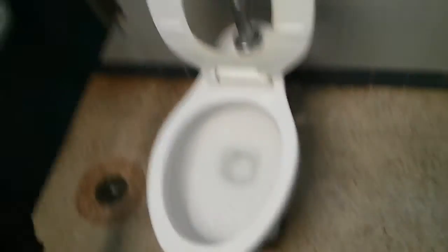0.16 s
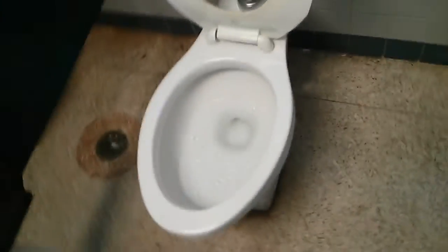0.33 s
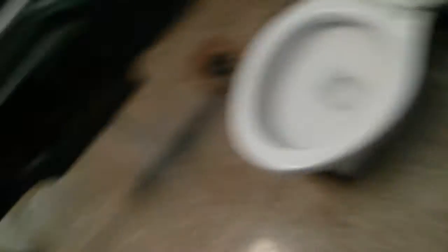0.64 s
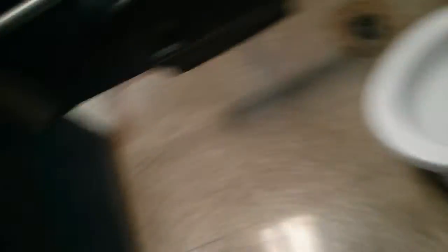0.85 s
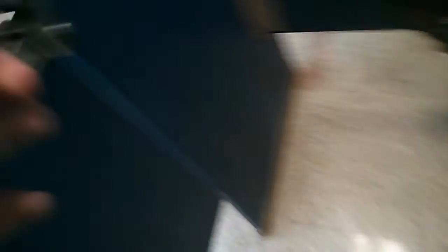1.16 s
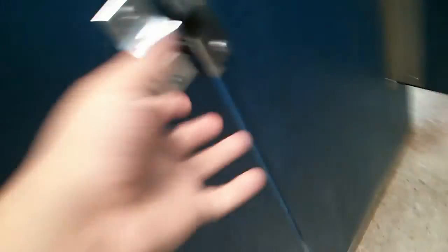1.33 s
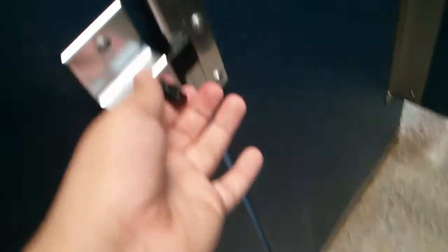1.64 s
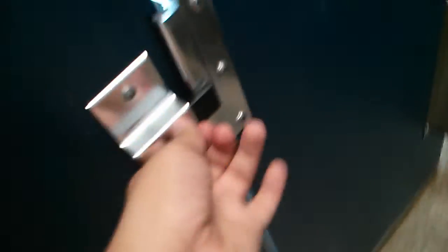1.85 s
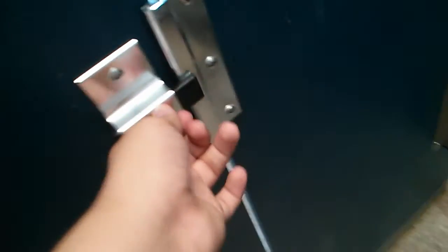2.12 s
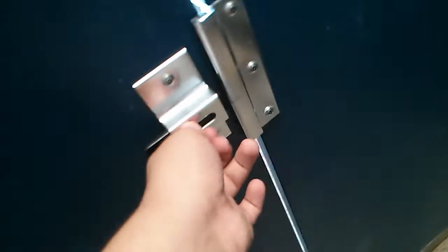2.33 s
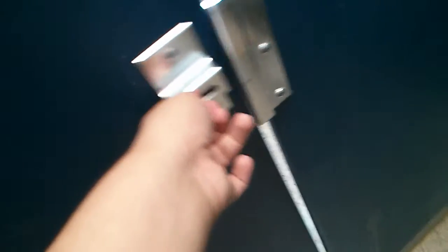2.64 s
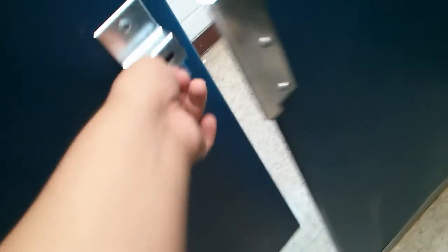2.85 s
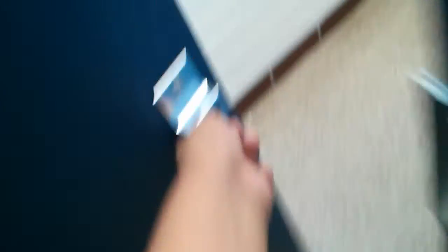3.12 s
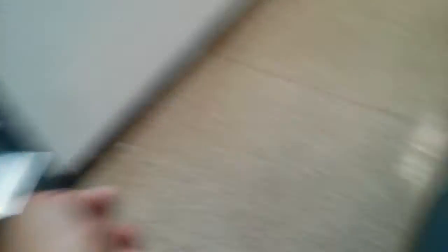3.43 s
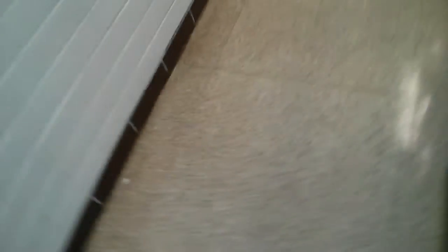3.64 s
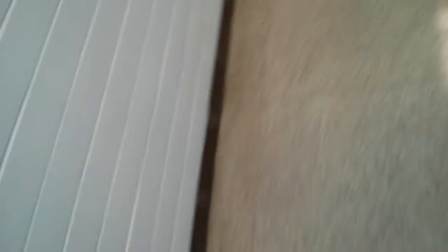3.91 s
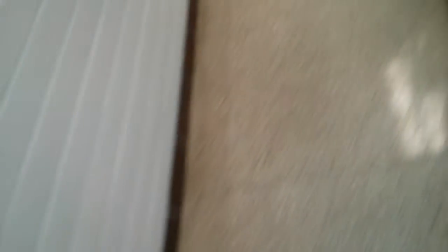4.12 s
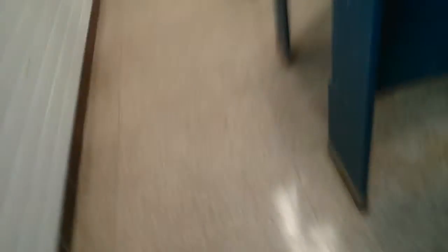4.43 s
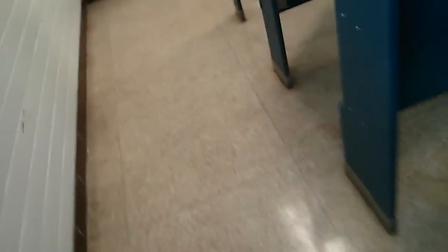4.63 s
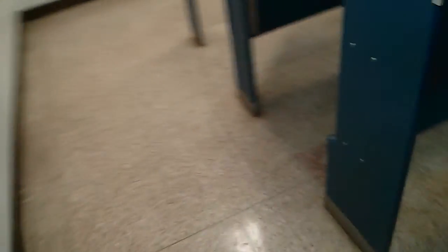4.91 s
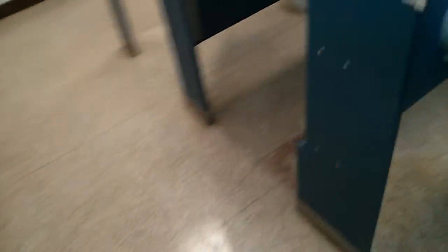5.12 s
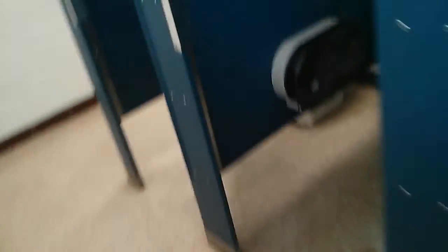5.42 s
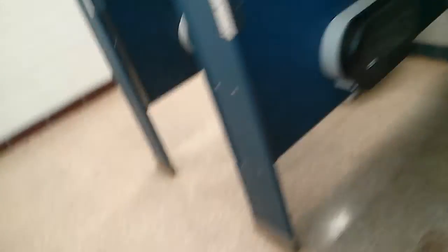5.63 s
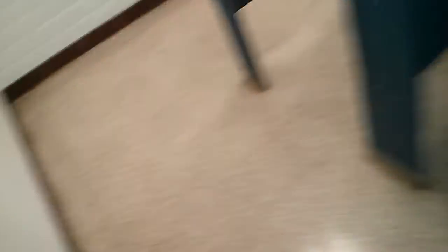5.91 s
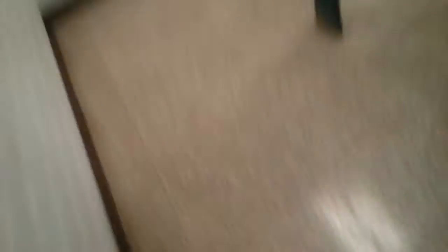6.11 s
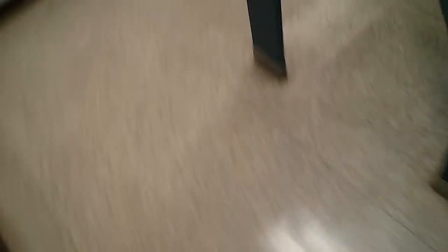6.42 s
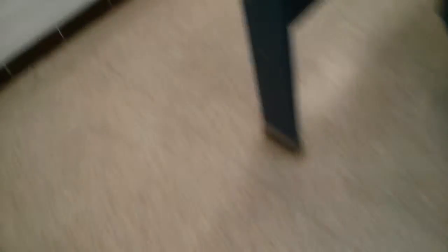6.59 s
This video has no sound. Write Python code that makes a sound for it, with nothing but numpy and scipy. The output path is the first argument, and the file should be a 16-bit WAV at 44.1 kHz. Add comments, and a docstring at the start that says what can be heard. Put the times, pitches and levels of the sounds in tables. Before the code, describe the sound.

A steady low electrical hum swells and fades as the microphone moves through a hard-walled restroom. Small plastic taps and soft brushing lead to a hard metal crack of a stall bolt, then a few loose latch rattles. After a quieter pause the door clacks gently; low, soft steps follow, with close clicks on the device, faint squeaks and rustling, until the end.

```python
"""A tiled restroom: someone walks out of a toilet stall while a mains-driven motor, probably the ventilation, hums.
The hum is a set of sines; each swells and fades as the microphone moves through the room's standing waves.
The steel latch snaps and rattles and the door clacks: short noise bursts plus ringing tones, with echoing walls.
Soft steps, brushing and squeaks are shaped noise; taps on the hand-held device are very short clicks.
Underneath lie rumbling air, a faint rustle of clothes and hiss, all made of coloured noise."""
import sys
import numpy as np
from scipy import signal
from scipy.fft import rfft, irfft, next_fast_len
from scipy.io import wavfile
from scipy.ndimage import map_coordinates

SR = 44100
rng = np.random.default_rng(int(sys.argv[2]) if len(sys.argv) > 2 else 0)


def dump_mix(stems):
    """Bounce the given channels to the path in sys.argv[1] as a 16-bit WAV at rate SR."""
    frames = np.atleast_2d(stems).T  # one column per channel
    limited = np.clip(frames, -1, 1)  # hard clip at full scale
    pcm = np.round(limited * 32767).astype(np.int16)
    wavfile.write(sys.argv[1], SR, pcm)


N = 298107  # length of the scene in samples

# how briskly the walker moves, faster once outside the stall: (time [s], share of full pace)
WALK_PACE = [(3.3, 0.38), (4.2, 0.98)]


def amp(db):
    """Turn decibels into a gain factor."""
    return 10 ** (np.asarray(db) / 20)


def unit(x):
    """Scale to an rms (average strength) of 1."""
    return x / np.sqrt(np.mean(x ** 2) + 1e-20)


def along(points, hz):
    """Read a curve of (frequency [Hz], value) points, joined by straight lines on a log frequency axis."""
    f, v = np.transpose(points)
    return np.interp(np.log(hz + 1), np.log(f + 1), v)


def curves(rows):
    """Join the points of each column after the time into a curve with one value per sample."""
    times, *columns = np.transpose(rows)
    return [np.interp(np.arange(N) / SR, times, column) for column in columns]


def wobble(rate):
    """A smooth random curve through `rate` random points a second."""
    knots = rng.standard_normal(int(N * rate / SR) + 4)
    return map_coordinates(knots, [np.arange(N) * rate / SR])


def noise(spectrum, size=N):
    """Noise with the given balance of low and high frequencies, rms 1."""
    m = next_fast_len(size)
    gain = amp(along(spectrum, np.fft.rfftfreq(m, 1 / SR)))
    return unit(irfft(rfft(rng.standard_normal(m)) * gain, m)[:size])


def band(hz, octaves):
    """A hump-shaped spectrum around hz."""
    hump = [(-4, -60), (-2, -24), (-1, -6), (0, 0), (1, -6), (2, -24), (4, -70)]  # (widths away, dB)
    return [(hz * 2 ** (k * octaves), db) for k, db in hump]


def fade(t60):
    """One second of exponential decay that falls by 60 dB every t60 seconds."""
    return np.exp(-np.log(1000) * np.arange(SR) / SR / t60)


def click(spectrum, size=1024):
    """A single impulse with this spectrum, its energy as early as possible (minimum phase), peak 1."""
    cepstrum = irfft(np.log(amp(along(spectrum, np.fft.rfftfreq(size, 1 / SR)))))
    # folding the second half onto the first leaves nothing before time zero
    cepstrum[1:size // 2] *= 2
    cepstrum[size // 2 + 1:] = 0
    pulse = irfft(np.exp(rfft(cepstrum)))
    return pulse / np.abs(pulse).max()


def burst(spectrum, t60):
    """A contact that excites many close resonances: coloured, decaying noise that starts near rms 1."""
    colour = click(spectrum)
    decaying_noise = fade(t60) * rng.choice([-1, 1], SR)
    return signal.fftconvolve(decaying_noise, colour / np.linalg.norm(colour))[:SR]


def ring(modes):
    """Fading tones of struck metal, of slightly random strength; loose contact blurs their pitch."""
    t = np.arange(SR) / SR
    power = sum(amp(db) ** 2 for hz, db, t60 in modes) / 2
    out = np.zeros(SR)
    for hz, db, t60 in modes:
        blur = .1 * wobble(90)[:SR]  # in cycles
        phase = hz * t + rng.random() + blur
        out += amp(db + rng.normal(0, 1)) * fade(t60) * np.sin(2 * np.pi * phase)
    onset = 1 - np.exp(-t / .0012)
    return onset * out / np.sqrt(power)  # near rms 1 just after the onset


def stroke(s, length):
    """A smooth rise and fall around time s."""
    return np.exp(-2 * ((np.arange(N) / SR - s) / length) ** 2)


def add(track, s, sound):
    """Mix a sound in at time s."""
    start = round(s * SR)
    track[start:start + len(sound)] += sound[:max(N - start, 0)]


def room(x, wet_db):
    """Add the echo of the tiled walls: noise that dies away at its own pace at each frequency."""
    # how long the echo takes to fall by 60 dB: (frequency [Hz], time [s])
    tiles = [(150, .6), (500, 0.55), (1400, 0.33), (3500, 0.32), (8000, 0.28), (14000, 0.22)]
    hz, t, z = signal.stft(rng.standard_normal(SR), SR, nperseg=256)
    decay = amp(-60 * t / along(tiles, hz)[:, None])
    tail = signal.istft(z * decay, SR, nperseg=256)[1]
    tail = np.pad(tail / np.linalg.norm(tail), (SR // 200, 0))  # the echo starts 5 ms late
    return x + amp(wet_db) * signal.fftconvolve(x, tail)[:N]


def tone(hz, level_db, drift):
    """A sine of the given rms level; its phase drifts (in radians) as the microphone moves."""
    cycles = hz * np.arange(N) / SR + rng.random()
    return np.sqrt(2) * amp(level_db) * np.sin(2 * np.pi * cycles + drift * wobble(3.0))


def bolt():
    """A hard, bright steel crack; the dense ring of the latch and the door skin follows a moment later."""
    # light contacts, then the bolt hits its stop: (time [s], level [dB])
    snap = [(1.8405, -57), (1.849, -46), (1.8542, -4.5), (1.863, -20.5)]
    # ringing tones of the steel: (frequency [Hz], level [dB], time to fall by 60 dB [s])
    bolt_modes = [(1690, -6, 0.11), (1940, -3, .2), (2344, -4, .2), (2708, -9.5, .2), (3040, -1.5, 0.14),
                  (3230, -13.5, 0.16), (4060, -11.5, .2), (4581, -8, 0.1734), (4800, -12.5, .18),
                  (5335, -11.5, .18), (6000, -7, .2), (6250, -10, .2), (6880, -2, .21), (7666, -7.5, 0.17),
                  (8600, -2.5, .2), (8292, 1, .2), (8860, -3.5, .2), (9250, -6.5, .18), (9870, -13, .19),
                  (10400, -16, .19), (11400, -17, .17)]
    # colour of the first crack: (frequency [Hz], level [dB])
    bolt_crack = [(300, -35), (900, -24), (1500, -17), (3000, -14), (4200, -23.5), (5800, -8), (7500, 0),
                  (8800, 0), (10500, -12.5), (13000, -19), (15500, -16.5)]
    # colour of the longer burst after it: (frequency [Hz], level [dB])
    bolt_body = [(250, -32.5), (500, -10), (750, -24), (1040, -27), (1300, -4), (1900, -1.5), (3000, -2),
                 (4000, -4), (4600, -1.5), (5500, -11), (7400, 4), (8600, -6.5), (9800, -9.5), (11700, -10),
                 (12800, -23.5), (15800, -21)]
    out = np.zeros(N)
    for s, db in snap:
        add(out, s, amp(db) * burst(bolt_crack, t60=0.028))
        body = amp(db - 7.5) * burst(bolt_body, t60=0.15)
        body += amp(db - 14.5) * ring(bolt_modes)
        add(out, s + 0.0036, body)
    return room(out, wet_db=-10.0)


def rattle():
    """The loose latch rattles in its keeper: duller, ringing contacts, each with a short bright tick."""
    # the contacts: (time [s], level [dB], bright tick level [dB])
    contacts = [(1.828, -57.5, -77), (1.84, -39.5, -68.5), (1.858, -20.5, -50.5), (2.198, -23.5, -27.5),
                (2.2245, -20, -54), (2.2871, -13.5, -58), (2.303, -23, -72)]
    # ringing tones of the keeper: (frequency [Hz], level [dB], time to fall by 60 dB [s])
    keeper_modes = [(1230, -14.5, 0.46), (1345, -10.5, 0.3), (1643, -13.5, .18), (1905, 1.5, .19),
                    (2170, 1, 0.16), (2356, -4.5, 0.23), (2727, -13, 0.18), (4318, -14, 0.12),
                    (4595, -11, 0.16), (4947, -11, 0.19)]
    # colour of the contact: (frequency [Hz], level [dB])
    keeper_body = [(500, -30.5), (950, -21.5), (1280, 8), (1700, 2), (2200, 10), (2600, -4), (3050, -11.5),
                   (3800, -24), (4400, -8), (4900, -7), (5600, -27), (6600, -19), (9000, -44.5),
                   (15000, -59)]
    # colour of the bright tick: (frequency [Hz], level [dB])
    latch_tick = [(1000, -22), (3000, -2.5), (4000, -4.5), (5500, -2), (7000, -4.5), (8800, -5),
                  (10500, -21.5), (15500, -29)]
    out = np.zeros(N)
    for s, db, tick_db in contacts:
        body = amp(-4.5) * burst(keeper_body, t60=.055)
        body += amp(6) * click(keeper_body, size=SR)
        body += amp(-11.5) * ring(keeper_modes)
        add(out, s, amp(db) * body + amp(tick_db) * burst(latch_tick, t60=0.025))
    return room(out, wet_db=-8)


def door():
    """The swinging door clacks and rings faintly, with a strong answer from the walls."""
    # the clacks: (time [s], level [dB])
    clacks = [(4.2679, -38.5), (4.2721, -28), (4.282, -34)]
    # colour of a clack: (frequency [Hz], level [dB])
    door_body = [(600, -34), (1100, -9), (1500, 3.5), (1950, 3), (2500, -9.5), (3200, -5), (3900, -18),
                 (4800, -14), (5800, -52.5), (12000, -48)]
    # ringing tones of the door: (frequency [Hz], level [dB], time to fall by 60 dB [s])
    door_modes = [(1410, -8, 0.48), (1460, 0.5, 0.31), (1645, -3, 0.28), (1906, -4, 0.26),
                  (2500, -24, 0.21), (3130, -32, 0.24), (3240, -21, 0.26)]
    out = np.zeros(N)
    for s, db in clacks:
        clack = amp(-1.5) * burst(door_body, t60=0.076)
        clack += amp(-12) * ring(door_modes)
        add(out, s, amp(db) * clack)
    return room(out, wet_db=-4.0)


def taps():
    """Fingers tap the hand-held device: very short, close contacts on a plastic case that buzzes briefly."""
    # the taps: (time [s], dull knock level [dB], bright tick level [dB])
    touches = [(.037, -39, -44), (0.0466, -18.5, -32.5), (.056, -42, -34), (0.1834, -42, -33.5),
               (0.623, -37, -44), (.843, -45, -64), (0.894, -41, -57), (.99, -49, -57), (4.748, -48, -68),
               (4.8898, -22.5, -28.5), (5.084, -45, -68), (6.047, -23, -24), (6.757, -29, -21)]
    # colour of the dull knock: (frequency [Hz], level [dB])
    knock = [(200, -4), (600, -3.5), (950, -0.5), (1400, 10), (2150, 5), (2800, -26), (4500, -17.5),
             (7000, -8.5), (15000, -41.5)]
    # colour of the bright tick: (frequency [Hz], level [dB])
    tick = [(1000, -20.5), (3500, -8), (5000, -0.5), (6600, 2.5), (8500, -6), (11000, -16.5),
            (15500, -15.5)]
    out = np.zeros(N)
    for s, knock_db, tick_db in touches:
        add(out, s, amp(knock_db) * click(knock) + amp(tick_db) * click(tick))
        buzz = amp(knock_db - 14.0) * burst(knock, t60=0.016)
        buzz += amp(tick_db - 14.5) * burst(tick, t60=0.018)
        add(out, s + 0.0013, buzz)
    return room(out, wet_db=-10.5)


def walking():
    """Low thuds of fading noise, soft gritty brushing of soles and sleeves, and faint squeaks."""
    # soft steps and bumps: (time [s], level [dB], centre [Hz], time to fall by 60 dB [s])
    steps = [(0.296, -48.5, 436, 0.27), (2.925, -57, 390, 0.63), (3.413, -40, 69.5, 0.083),
             (4.061, -49, 560, 0.072), (4.109, -46.5, 520, 0.06), (4.21, -42, 480, 0.2),
             (4.234, -38.5, 190, .3), (4.36, -42.5, 232, 0.41), (4.889, -32, 293, 0.27),
             (6.053, -36.5, 92, .19), (6.109, -35, 198, 0.5), (6.555, -37, 335, .22)]
    # brushing strokes: (time [s], length [s], dull rub level [dB], bright swish level [dB])
    scuffs = [(0.207, 0.13, -61, -69), (0.479, 0.13, -60.5, -62.5), (0.643, 0.042, -54.5, -63),
              (0.909, 0.04, -55.5, -77.5), (2.412, 0.17, -60, -72), (5.007, 0.14, -64, -69.5),
              (5.996, 0.021, -66.5, -68), (6.13, 0.13, -60.5, -63.5), (6.636, 0.25, -63, -70)]
    # squeaks of the soles: (time [s], length [s], level [dB], centre [Hz], width [octaves])
    squeaks = [(4.811, .03, -63, 4690, 0.046), (5.582, 0.13, -65.5, 4000, 0.27),
               (6.691, 0.047, -71, 4360, 0.12)]
    thuds, t = np.zeros(N), np.arange(SR) / SR
    onset = 1 - np.exp(-t / 0.00051)
    for s, db, hz, t60 in steps:
        add(thuds, s, amp(db) * onset * fade(t60) * noise(band(hz, octaves=0.69), size=SR))
    thuds = signal.sosfilt(signal.butter(6, 680, fs=SR, output="sos"), thuds)  # keep below 680 Hz

    rub = noise(band(1407, octaves=0.47))
    swish = noise(band(6987, octaves=.55))
    friction = np.zeros(N)
    for s, length, rub_db, swish_db in scuffs:
        friction += stroke(s, length) * (amp(rub_db) * rub + amp(swish_db) * swish)
    for s, length, db, hz, octaves in squeaks:
        friction += amp(db) * stroke(s, length) * noise(band(hz, octaves))
    grit = unit(amp(3.0 * np.tanh(wobble(120))))  # fast unevenness
    return thuds + friction * grit


def hum():
    """Mains harmonics, with sidebands from the turning rotor that make them flutter; walking makes them waver."""
    # each harmonic as the microphone crosses its standing wave, before its own gain: (time [s], level [dB])
    HUM_120 = [(0.0, -63.5), (0.03, -55.5), (0.71, -62), (1.25, -35.5), (2.46, -32), (3.6, -47),
               (4.61, -70), (4.87, -51.5), (5.99, -56.5), (6.05, -44), (6.27, -56.5), (6.7, -53)]
    HUM_180 = [(0.0, -65), (3.06, -60.5), (3.11, -68.5), (3.97, -46.5), (4.07, -66), (4.22, -41.5),
               (4.38, -57), (4.52, -45), (4.63, -48), (4.72, -60), (4.93, -48.5), (4.98, -63.5), (5.6, -55),
               (6.62, -48.5), (6.7, -53.5)]
    HUM_240 = [(0.0, -45), (0.09, -35.5), (0.54, -46), (1.1, -35), (1.21, -38), (1.7, -63), (3.1, -63.5),
               (3.32, -55.5), (4.22, -59.5), (4.23, -51.5), (4.44, -45.5), (5.15, -43), (5.41, -68),
               (5.64, -46.5), (5.75, -44.5), (6.14, -59.5), (6.59, -44.5), (6.7, -49)]
    HUM_360 = [(0.0, -60), (0.15, -48), (1.42, -67), (1.6, -60), (2.65, -66), (3.21, -43.5), (3.49, -57.5),
               (4.35, -48.5), (5.06, -68.5), (5.69, -50.5), (5.97, -54.5), (6.14, -41), (6.36, -49),
               (6.57, -47.5), (6.7, -67.5)]
    HUM_480 = [(0.0, -78.5), (0.09, -56), (0.9, -62.5), (1.04, -72), (3.49, -57), (3.67, -68), (4.18, -57),
               (4.64, -66), (4.83, -49), (5.45, -75), (6.55, -49.5), (6.7, -56.5)]
    # the harmonics: (mains multiple, level curve from above, gain on that curve [dB],
    # mean level of the lower rotor sideband [dB], mean level of the upper one [dB])
    harmonics = [(2, HUM_120, -0.5, -61.5, -62), (3, HUM_180, 0, -66, -64.5), (4, HUM_240, 1, -60.5, -70.5),
                 (6, HUM_360, 0.5, -56.5, -67), (8, HUM_480, 0.5, -64, -73)]
    # weak high tones: (frequency [Hz], mean level [dB])
    faint = [(581, -73.5), (600, -70)]
    mains_hz, rotor_hz = 60, 19.1
    sideband_follows = 0.48  # share of a harmonic's swell, in dB, that its sidebands take on
    waver_db, drift_rad = 3.18, 0.11  # at full pace: level waver; phase drift for each mains multiple
    pace, = curves(WALK_PACE)
    out = np.zeros(N)
    for multiple, level, gain_db, lower_db, upper_db in harmonics:
        level_db, = curves(level)
        swell_db = sideband_follows * (level_db - level_db.mean())
        drift = drift_rad * multiple * pace
        for side, db in [(0, level_db + gain_db), (-1, lower_db + swell_db), (1, upper_db + swell_db)]:
            hz = multiple * mains_hz + side * rotor_hz
            out += tone(hz, db + waver_db * pace * wobble(12), drift)
    for hz, db in faint:
        out += tone(hz, db + 2.5 * wobble(2.3), drift=0.97)
    return out


def drone():
    """Three motor tones: one falls away along the walk, one swells and fades, the deepest beats slowly."""
    # the swelling tone, before a 0.5 dB cut: (time [s], level [dB])
    flutter_level = [(0.0, -57), (0.03, -50), (1.27, -56.5), (1.55, -68.5), (3.43, -66), (4.57, -45.5),
                     (5.32, -63), (6.62, -59), (6.7, -64.5)]
    # the deepest tone, before a 1.5 dB cut: (time [s], level [dB])
    throb_level = [(0, -57), (.9, -48), (1.5, -52), (2.55, -48), (3.3, -58.5), (3.85, -64), (4.9, -52),
                   (6.7, -56)]
    t = np.arange(N) / SR
    pace, = curves(WALK_PACE)
    falling_db = -45.5 - 3 * t + 1.8 * wobble(7.1)  # loses 3 dB a second
    falling = tone(140.9, falling_db, drift=.35 * pace)

    flutter_db = curves(flutter_level)[0] - .5 + 1.2 * pace * wobble(13)
    flutter = tone(259.1, flutter_db, drift=1.8 * pace)

    beat_s, beat_peak_s, beat_db = .422, .05, 5  # period, first swell, swing up and down
    beat = beat_db * np.cos(2 * np.pi * (t - beat_peak_s) / beat_s)
    throb_db = curves(throb_level)[0] - 1.5 + beat + 1.5 * wobble(5)
    return falling + flutter + tone(57.6, throb_db, drift=1.4)


def air():
    """Moving air rumbles in uneven lumps; a faint rustle of clothes and the microphone's hiss lie above it."""
    # the rumble, before a 0.5 dB cut: (time [s], level [dB])
    air_level = [(0.0, -48), (0.86, -52.5), (1.14, -54), (2.69, -54), (3.17, -50.5), (3.43, -51),
                 (4.03, -55.5), (4.22, -47.5), (4.83, -46.5), (5.32, -53.5), (6.42, -51), (6.7, -46.5)]
    # the rustle: (time [s], level [dB])
    rustle_level = [(0, -67), (.3, -68), (1.2, -69.5), (2.8, -71.5), (3.8, -70), (4.5, -69.5), (5.0, -68),
                    (5.35, -69), (5.85, -70), (6.15, -59.5), (6.4, -70.5), (6.7, -66)]
    # the hiss: (time [s], level [dB])
    hiss_level = [(0, -68), (.9, -68.5), (2.2, -68), (3.2, -71), (4.0, -66.5), (4.9, -67), (5.4, -72),
                  (6.7, -67.5)]
    # colour of the rumble: (frequency [Hz], level per Hz [dB])
    rumble_colour = [(25, -1), (45, -8.5), (80, -4), (190, 1.5), (280, -1.5), (400, -4.5), (560, -10),
                     (720, -21.5), (1100, -34), (2500, -51.5)]
    # colour of the rustle: (frequency [Hz], level per Hz [dB])
    rustle_colour = [(400, -13.5), (850, 5), (1400, 2), (2100, -1.5), (2900, -15.5), (4600, -4.5),
                     (7000, -13), (12000, -36)]
    # colour of the hiss: (frequency [Hz], level per Hz [dB])
    hiss_colour = [(1470, -38), (2500, -19), (3130, -19), (3620, -12), (4560, -11.5), (5160, -5),
                   (6820, -4), (9210, 4.5), (11100, -5.5), (13000, -6.5), (15800, -12.5)]
    eddies = sum(amp(5 * np.tanh(wobble(20))) * noise(rumble_colour) for _ in range(2))
    rumble = amp(curves(air_level)[0] - 0.5) * unit(eddies)
    rustle = amp(curves(rustle_level)[0] + 2.4 * wobble(6.9)) * noise(rustle_colour)
    hiss = amp(curves(hiss_level)[0] + 1.0 * wobble(7)) * noise(hiss_colour)
    return rumble + rustle + hiss


def scene():
    """Everything at one microphone."""
    latch_and_door = bolt() + rattle() + door()
    person = taps() + walking()
    background = hum() + drone() + air()
    return (latch_and_door + person + background)[None]


def record(dry):
    """The loudest peaks are squashed smoothly; nothing passes above the band limit."""
    top_hz = 15900
    squashed = dry / (1 + np.abs(dry / .72) ** 6) ** (1 / 6)  # never exceeds 0.72
    m = next_fast_len(N + SR // 2)
    passes = np.fft.rfftfreq(m, 1 / SR) < top_hz
    return irfft(rfft(squashed, m) * passes, m)[..., :N]


dry = scene()
out = record(dry)
dump_mix(out)
```